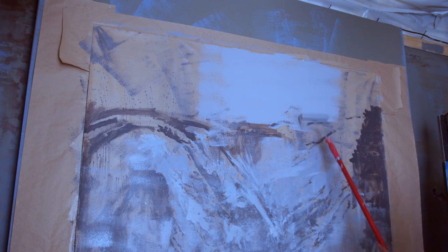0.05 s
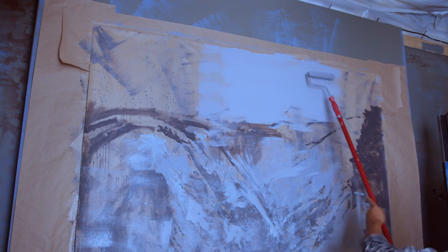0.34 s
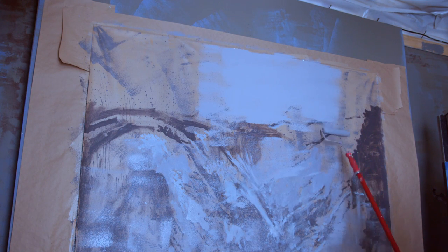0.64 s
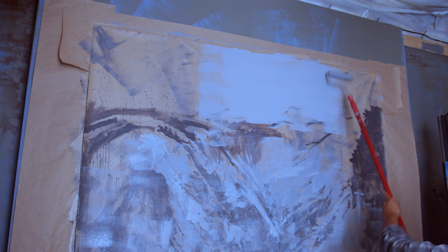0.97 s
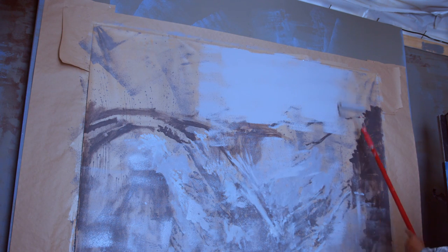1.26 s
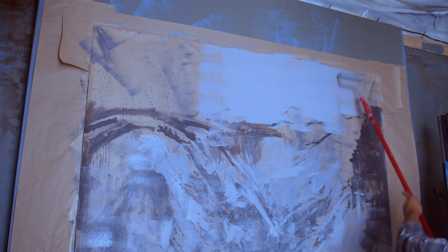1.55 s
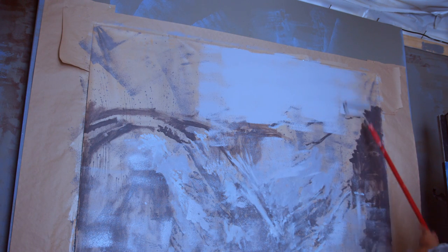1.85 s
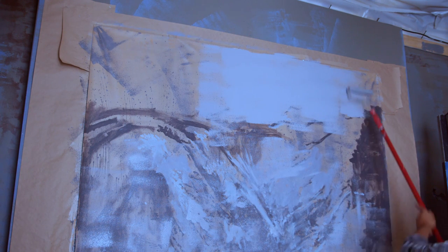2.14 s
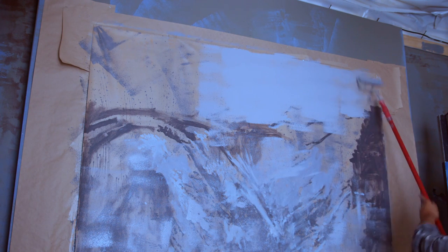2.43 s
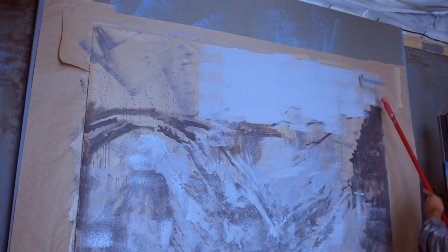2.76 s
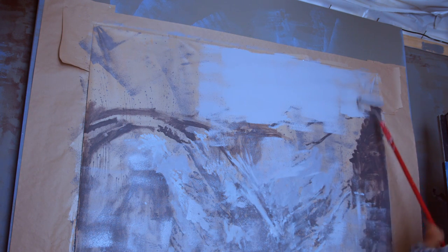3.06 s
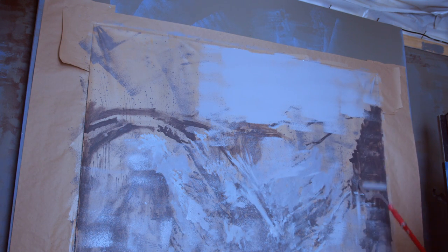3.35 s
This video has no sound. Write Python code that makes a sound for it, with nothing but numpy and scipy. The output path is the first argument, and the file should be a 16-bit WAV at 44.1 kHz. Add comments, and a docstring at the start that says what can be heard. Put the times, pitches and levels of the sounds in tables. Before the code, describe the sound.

A paint roller on a pole rolls up and down a paper-covered board in a quiet room. Each uneven stroke hisses with brief sticky peels, while the loose roller rattles and clacks and the board rumbles and thuds.

```python
"""In a quiet room, a paint roller on a pole is worked up and down a large paper-covered board.
The nap hisses and swishes as its fibres let go of the paper; wet paint peels off in short, sticky bursts.
The board rumbles and thuds under the bumps; the loose roller chatters and knocks on its wire frame,
which sings faintly. The strokes die down at the turns, over deep handling rumble and still air."""
import sys
import numpy as np
from scipy import signal
from scipy.fft import rfft, irfft
from scipy.io import wavfile
from scipy.ndimage import uniform_filter1d

SR = 44100
rng = np.random.default_rng(int(sys.argv[2]) if len(sys.argv) > 2 else 0)


def store_pcm(level_fs):
    """Save levels as 16-bit WAV."""
    pcm = np.round(np.clip(level_fs, -1, 1) * 32767).astype(np.int16)
    wavfile.write(sys.argv[1], SR, np.atleast_2d(pcm).T)


N = 158760
TIME, FREQS = np.arange(N) / SR, np.fft.rfftfreq(2 * N, 1 / SR) + 1e-3

# Fader rides and cues; levels are relative within each layer.
# rubbing of the nap, one list per run of strokes: t/s, hiss level/dB
RUB_RIDE = [
    [(0.0, -59.5), (0.058, -62.5), (0.218, -54), (0.394, -57), (0.6, -52)],
    [(0.76, -60.5), (0.818, -53.5), (1.074, -57), (1.338, -50), (1.41, -54), (1.42, -78)],
    [(1.42, -56.5), (1.47, -52.5), (1.658, -49.5), (1.725, -64), (1.87, -49), (1.97, -48.5), (2.04, -62)],
    [(2.04, -64), (2.092, -50.5), (2.412, -55.5), (2.488, -49.5), (2.634, -53)],
    [(2.67, -63), (2.704, -50.5), (2.904, -57.5), (2.94, -67)],
    [(2.94, -66), (3.036, -53.5), (3.29, -53), (3.49, -61.5), (3.6, -72)],
]
# push on the board, one list per run of strokes: t/s, rumble level/dB, chatter level/dB
PUSH_RIDE = [
    [(0.0, -46, -47), (0.124, -54.5, -72.5), (0.284, -42, -43.5), (0.392, -49, -60.5), (0.646, -43, -49)],
    [(0.77, -57.5, -83), (0.834, -42.5, -51.5), (1.064, -44, -48), (1.136, -61, -69), (1.34, -40, -47.5),
     (1.42, -39, -63)],
    [(1.42, -50.5, -66), (1.516, -34.5, -40.5), (1.634, -29, -41.5), (1.7, -42.5, -60.5),
     (1.95, -39, -45.5), (2.04, -47.5, -98)],
    [(2.04, -48, -75), (2.096, -36.5, -57.5), (2.2, -37.5, -44), (2.44, -58.5, -76), (2.588, -44.5, -50)],
    [(2.67, -42, -56), (2.768, -43.5, -54.5), (2.788, -41, -44), (2.808, -33, -51), (2.914, -44.5, -55)],
    [(2.94, -54.5, -64), (2.98, -51.5, -52), (3.16, -39, -44.5), (3.236, -44, -46.5), (3.326, -42, -50),
     (3.6, -64, -62.5)],
]
# tone of the board as the contact moves: t/s, upper modes over lower ones/dB
TILT_RIDE = [(0, -10.5), (.15, 18), (.25, -1.5), (.42, 11.5), (.6, 6), (.74, -18.5), (.95, 4.5), (1.38, 4),
             (1.69, -4), (2.23, -3), (2.38, 12.5), (2.73, -5.5), (2.8, -2)]
# singing of the wire: t/s, level/dB
WIRE_RIDE = [(0, -69), (.9, -67), (1.3, -62), (1.73, -76), (2.93, -74.5), (3.2, -61), (3.49, -62),
             (3.6, -79)]
# deep handling rumble: t/s, level/dB
HANDLING_RIDE = [(.15, -62), (.9, -56), (1.0, -46), (1.2, -58.5), (1.6, -49.5), (2.45, -57.5), (3.3, -55),
                 (3.6, -63)]
# short sticky peels of paint and longer swishes of the nap: centre t/s, length/s, level/dB
SWELL_CUES = [(0.107, 0.04, -55), (0.228, 0.034, -43), (0.32, 0.032, -47), (0.51, 0.21, -53),
              (0.595, 0.031, -51), (0.825, 0.044, -49), (0.919, 0.03, -47), (0.987, 0.025, -49.5),
              (1.206, 0.13, -50), (1.485, 0.062, -42.5), (1.557, 0.035, -38.5), (1.635, 0.057, -44),
              (1.933, 0.13, -65), (2.097, 0.058, -48.5), (2.129, 0.03, -44), (2.505, 0.12, -45),
              (2.716, 0.041, -46)]
# knocks of the roller on its axle: t/s, level/dB, centre of the ring f/Hz
KNOCK_CUES = [(0.294, -31.5, 895), (0.9, -32, 800), (0.973, -25.5, 1090), (1.056, -37, 990),
              (1.24, -31, 720), (1.341, -32, 1420), (1.507, -24.5, 1480), (1.594, -23.5, 1650),
              (1.607, -25, 796), (1.935, -30.5, 1900), (2.16, -28.5, 1500), (2.704, -29, 1800),
              (2.773, -32.5, 1370), (2.788, -25.5, 1090), (3.074, -24.5, 1800), (3.147, -31, 1800),
              (3.156, -30.5, 1790), (3.208, -25, 2200), (3.217, -26.5, 1480), (3.227, -22.5, 2150),
              (3.239, -35, 1970), (3.273, -32, 1690), (3.287, -26.5, 1780)]
# heavy bumps on the board: t/s, level/dB, centre of the ring f/Hz
THUD_CUES = [(0.57, -29.5, 520), (0.592, -24, 216), (0.91, -26, 228), (1.303, -29, 265),
             (1.342, -23.5, 306), (1.448, -29, 220), (1.484, -23, 237), (1.523, -25.5, 217),
             (1.55, -21.5, 258), (1.604, -24.5, 173), (1.633, -28, 240), (1.727, -27.5, 375),
             (1.755, -30.5, 300), (1.901, -28.5, 169), (1.937, -22.5, 290), (1.978, -26.5, 192),
             (2.096, -30, 266), (2.196, -26.5, 110), (2.588, -36, 445), (2.627, -29.5, 383),
             (2.716, -28.5, 139), (2.8, -31.5, 169)]

# modes of the board: f/Hz, level/dB, t60/s
BOARD_MODES = [(110, -2, 0.089), (131, -1, 0.1), (156.7, -6.5, 0.12), (192, 0, 0.098), (244, 4.5, 0.029),
               (313.4, -4, 0.081), (374, -6, 0.035), (445, -1.5, 0.043), (495.4, -0.5, 0.031),
               (597, -6, 0.035), (664, -10.5, 0.032)]
# modes of the wire frame and pole: f/Hz, level/dB, t60/s
FRAME_MODES = [(694, 4.5, 0.011), (944, 2, 0.013), (1112, 4, 0.02), (1185, 4, 0.015), (1480, 7.5, 0.0022),
               (2105, -4, 0.024), (2100, 0, 0.012), (2690, 0, 0.0098), (2665, -0.5, 0.013),
               (3392, -5, 0.016), (3740, -7.5, 0.011)]
# high modes of the rubbed wire: f/Hz, level/dB, t60/s
WIRE_MODES = [(3280, 0, .018), (5160, 4, 0.026)]

# colour of the nap's hiss: f/Hz, level/dB
NAP_EQ = [(300, -2), (800, 1.5), (1500, -1), (2300, -0.5), (3300, 2.5), (5000, 1), (7000, -2.5),
          (9500, -3.5), (12000, -1.5), (15500, -1)]
# colour of the handling rumble: f/Hz, level/dB
HANDLING_EQ = [(20, -22), (44, -3), (54, -12), (70, -7.5), (110, -12.5), (300, -58)]
# colour of the room's air: f/Hz, level/dB
AIR_EQ = [(36, 1.5), (120, -37), (250, -17), (800, -9), (3000, -38), (16000, -31)]
# colour of the peels and swishes: f/Hz, level/dB
FIZZ_EQ = [(1000, -80), (2500, 1), (4000, 1), (7000, -3), (10000, 0), (12500, 3.5), (14500, 7.5),
           (16000, 0)]
# lean of the stereo image: f/Hz, left minus right/dB
LEFT_LEAN = [(70, 1), (160, 4.5), (330, 16), (1100, 13.5), (2000, 2), (3500, 3.5), (8000, 3), (10500, 15),
             (13000, 13.5), (16000, 7)]

ROOM_T60_S, BOARD_WET_DB, FRAME_WET_DB, RIGHT_EXTRA_WET_DB = 0.15, -8.5, -6.5, 25.5
BOARD_LOW_CUT_HZ = 96
MODE_SPREAD_DB = 2  # a mode's share varies with the point of contact


def from_db(db):
    """Decibels to gain."""
    return 10 ** (np.asarray(db) / 20)


def ride(rows):
    """Each fader curve of a table, at every sample."""
    times, *columns = np.transpose(rows)
    return [np.interp(TIME, times, column) for column in columns]


def eq_curve(points):
    """An EQ table in dB at every frequency."""
    hz, db = np.transpose(points)
    return np.interp(np.log(FREQS), np.log(hz), db)


def rolloff(ratio, power):
    """Filter slope in dB: FREQS / corner cuts the highs, corner / FREQS cuts the lows."""
    return -20 * np.log10(1 + ratio ** power)


def colour(x, db):
    """Runs a sound through an EQ curve."""
    return irfft(rfft(x, 2 * N) * from_db(db))[..., :N]


def pan_left(x):
    """Leans a sound to the left, by a different amount at each frequency."""
    lean = eq_curve(LEFT_LEAN)
    return colour(x, np.array([lean, 0 * lean]) - 10 * np.log10(1 + from_db(2 * lean)))


def rms_one(x):
    """Scales a stereo sound so that its mid has rms 1."""
    return x / (x.mean(0).std() + 1e-12)


def level_out(x, window_samples):
    """Rides the gain to hold a stereo texture steady."""
    x = rms_one(x)
    return x / np.sqrt(uniform_filter1d(x.mean(0) ** 2, size=window_samples) + 1e-3)


def drift(rate_hz):
    """A smooth random wobble with spread 1."""
    wobble = colour(rng.standard_normal(N), rolloff(FREQS / rate_hz, 2))
    return wobble / wobble.std()


def noise_bed(eq):
    """Coloured stereo noise, leaning left, with mid rms 1."""
    return rms_one(pan_left(colour(rng.standard_normal((2, N)), eq_curve(eq))))


def grains(per_s, spread_db, channels=1):
    """Tiny clicks of uneven size at random moments."""
    shape = (channels, N)
    sizes = from_db(spread_db * np.minimum(rng.exponential(1, shape), 5))
    return sizes * rng.choice([-1, 1], shape) * (rng.random(shape) < per_s / SR)


def ring(force, modes):
    """Drives a body's modes, each with a share that wanders as the contact moves."""
    out = 0
    for k, (hz, db, t60) in enumerate(modes):
        radius, angle = from_db(-60 / (t60 * SR)), 2 * np.pi * hz / SR
        poles = [1, -2 * radius * np.cos(angle), radius ** 2]
        share = from_db(db + MODE_SPREAD_DB * drift(64))
        out = out + (-1) ** k * signal.lfilter([1, 0, -1], poles, force * share + 1e-18)
    return out


def room(x, wet_db):
    """Direct sound plus a short diffuse tail; the shaded right side gets mostly tail."""
    response = rng.standard_normal((2, N)) * from_db(-60 * TIME / ROOM_T60_S) * (TIME > .002)
    send = from_db(wet_db + np.array([[0], [RIGHT_EXTRA_WET_DB]]))
    response *= send / np.linalg.norm(response, axis=1, keepdims=True)
    response[:, 0] = 1  # direct sound
    response /= np.linalg.norm(response, axis=1, keepdims=True)
    return pan_left(signal.fftconvolve(np.atleast_2d(x), response, axes=1)[:, :N])


def blows(cues, modes, contact_s):
    """Short scraping hits, each favouring the modes near its centre frequency."""
    out, t = np.zeros(2 * N), TIME[:SR // 5]
    hz, mode_db, t60 = np.transpose(modes)[:, :, None]
    for start_s, db, centre_hz in cues:
        focus_db = -10 * np.log2(hz / centre_hz) ** 2
        shares = from_db(mode_db + focus_db + MODE_SPREAD_DB * rng.standard_normal(hz.shape))
        pitches = hz * (1 + 0.021 * rng.standard_normal(hz.shape))  # pressure detunes each blow
        partials = from_db(-60 * t / t60) * np.sin(2 * np.pi * pitches * t)
        body = (shares * rng.choice([-1, 1], hz.shape) * partials).sum(0)
        body[0] = from_db(-20) * np.abs(body).max()  # a small crack on the attack
        scrape = rng.standard_normal(len(t)) * np.exp(-t / contact_s)
        hit = signal.fftconvolve(body, scrape)
        out[int(start_s * SR):][:len(hit)] += from_db(db) * hit / np.abs(hit).max()
    return out[:N]


def handling_rumble():
    """Handling puts a swelling low end under the strokes."""
    return from_db(ride(HANDLING_RIDE)[0]) * noise_bed(HANDLING_EQ)


def room_tone():
    """The still air of the room: a soft, steady bed."""
    return from_db(-61) * noise_bed(AIR_EQ)


def nap_hiss(rub_db):
    """Countless fibres let go of the paper: a fine, fluttering hiss that follows the stroke."""
    fibres = grains(per_s=12000, spread_db=2.6, channels=2)
    hiss = pan_left(colour(fibres, eq_curve(NAP_EQ)))
    presence_band = np.where((FREQS > 4000) & (FREQS < 8500), 0, -99)
    hiss /= colour(hiss.mean(0), presence_band).std()
    treble = colour(hiss, rolloff(7500 / FREQS, 6))
    dulling_db = np.interp(TIME, [3.1, 3.3], [0, -1])  # the roller leaves the wet paint
    hiss += treble * (from_db(dulling_db) - 1)
    return hiss * from_db(rub_db - 3 + 1.03 * drift(54))


def board_rumble(rumble_db):
    """Small bumps keep the board drumming, deep or hollow with the place of contact."""
    bumps = grains(per_s=900, spread_db=4)
    low_cut = rolloff(BOARD_LOW_CUT_HZ / FREQS, 14) / 2
    drum = room(colour(ring(bumps, BOARD_MODES), low_cut), BOARD_WET_DB)
    deep = colour(drum, rolloff(FREQS / 222, 8))
    hollow = colour(drum, rolloff(356 / FREQS, 8))
    tilt = from_db(ride(TILT_RIDE)[0] / 2)
    drum += deep * (1 / tilt - 1) + hollow * (tilt - 1)
    return level_out(drum, window_samples=1500) * from_db(rumble_db)


def axle_chatter(chatter_db):
    """The loose roller rattles on its axle, ringing the frame with clumps of ticks."""
    ticks = grains(per_s=1200, spread_db=0.5) * from_db(3.5 * drift(35))
    chatter = room(ring(ticks, FRAME_MODES), FRAME_WET_DB)
    return level_out(chatter, window_samples=3000) * from_db(chatter_db - 0.5)


def wire_song():
    """Rubbing draws a faint, wavering ring from the wire."""
    song = rms_one(room(ring(rng.standard_normal(N), WIRE_MODES), FRAME_WET_DB))
    return song * from_db(ride(WIRE_RIDE)[0] + 2 * drift(18))


def peels_and_swishes():
    """Bright bursts and swells: short sticky peels of paint and longer swishes of the nap."""
    swell = sum(from_db(db) * np.exp(-np.abs((TIME - centre_s) / (.6 * length_s)) ** 2.5)
                for centre_s, length_s, db in SWELL_CUES)
    clicks = grains(per_s=7500, spread_db=2.5, channels=2)
    fizz = rms_one(pan_left(colour(clicks, eq_curve(FIZZ_EQ))))
    return fizz * swell * from_db(2 + drift(80))


def axle_knocks():
    """The roller knocks on its axle, and frame and pole answer with a hard clack."""
    clacks = blows(KNOCK_CUES, FRAME_MODES, contact_s=0.0009)
    return from_db(5.02) * room(clacks, FRAME_WET_DB)


def board_thuds():
    """Heavier bumps thump the board, cushioned by the soft nap."""
    thuds = blows(THUD_CUES, BOARD_MODES, contact_s=0.0014)
    low_cut = rolloff(BOARD_LOW_CUT_HZ / FREQS, 14) / 2
    cushion = rolloff(FREQS / 650, 4) / 2
    return from_db(6.52) * room(colour(thuds, low_cut + cushion), BOARD_WET_DB)


def scene():
    """The mix, in four stems: a quiet bed, the roller, the board and the frame."""
    rub_db, = ride(np.vstack(RUB_RIDE))
    rumble_db, chatter_db = ride(np.vstack(PUSH_RIDE))
    bed = handling_rumble() + room_tone()
    roller = nap_hiss(rub_db) + peels_and_swishes()
    board = board_rumble(rumble_db) + board_thuds()
    frame = axle_chatter(chatter_db) + axle_knocks() + wire_song()
    return bed + roller + board + frame


def record(dry):
    """A steep high cut at 15.9 kHz on the whole mix."""
    return signal.sosfilt(signal.ellip(12, .1, 80, 15900, fs=SR, output="sos"), dry)


dry = scene()
out = record(dry)
store_pcm(out)
```